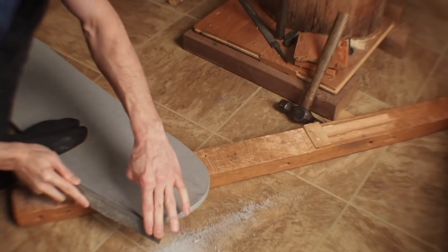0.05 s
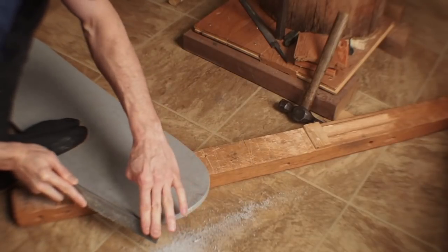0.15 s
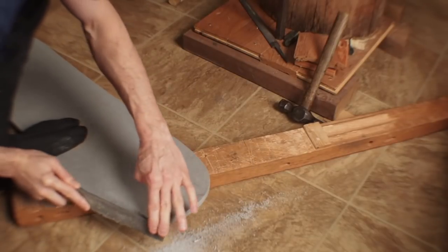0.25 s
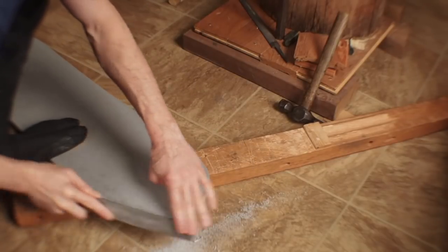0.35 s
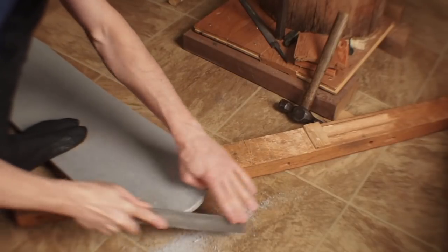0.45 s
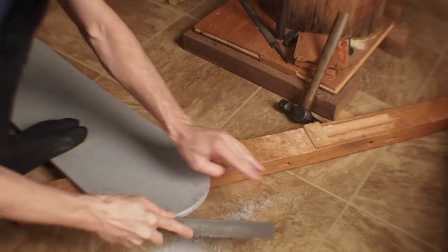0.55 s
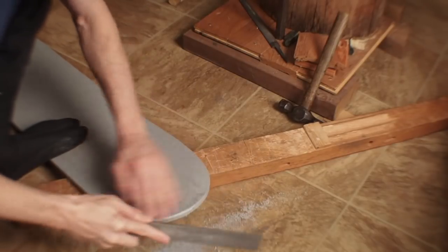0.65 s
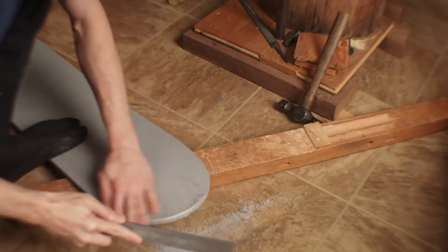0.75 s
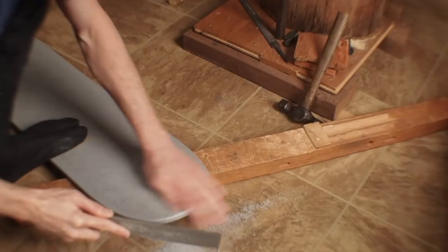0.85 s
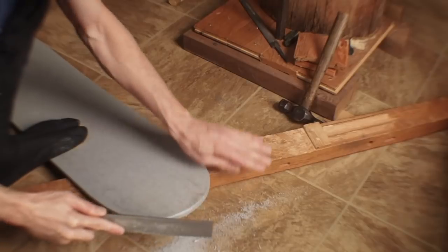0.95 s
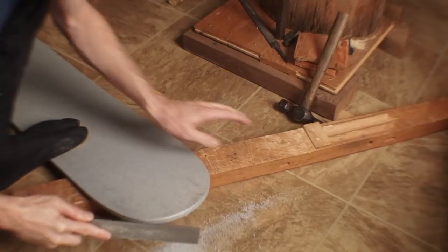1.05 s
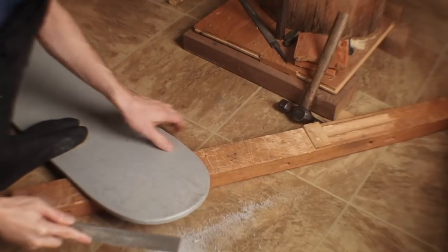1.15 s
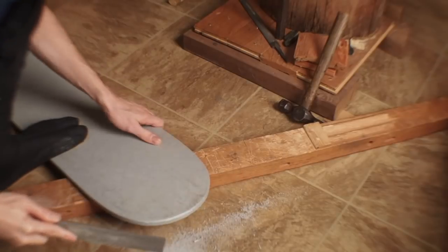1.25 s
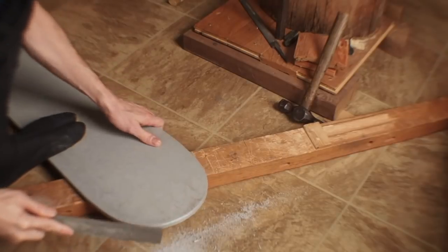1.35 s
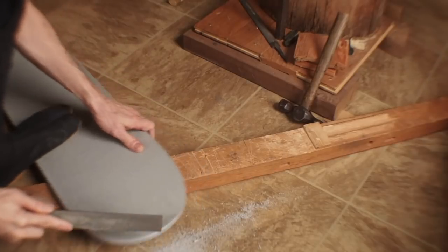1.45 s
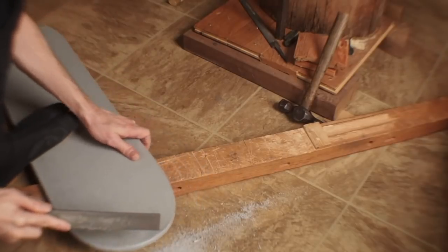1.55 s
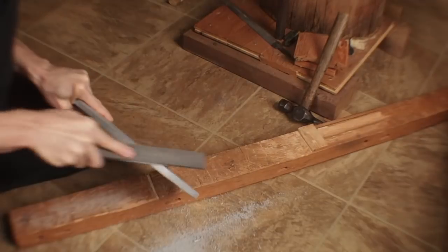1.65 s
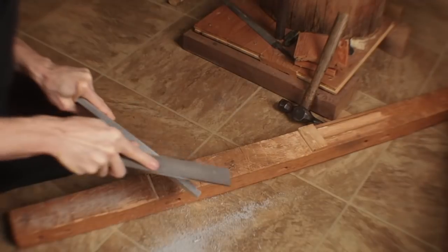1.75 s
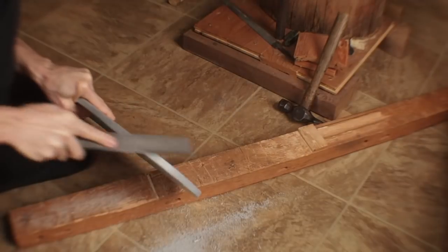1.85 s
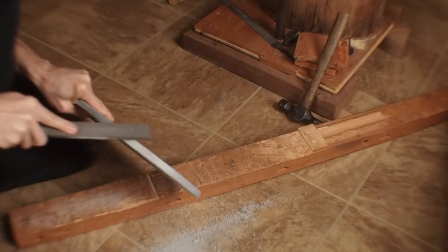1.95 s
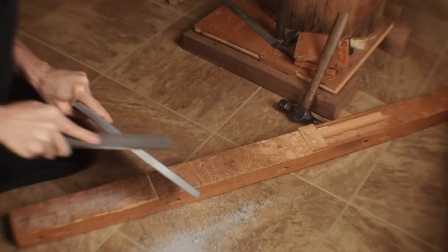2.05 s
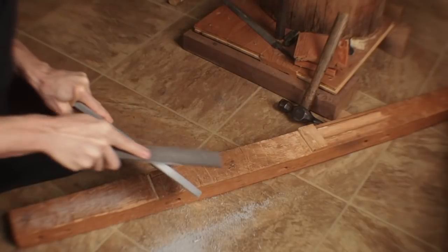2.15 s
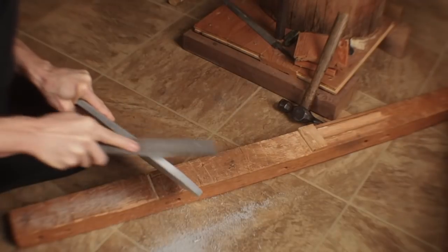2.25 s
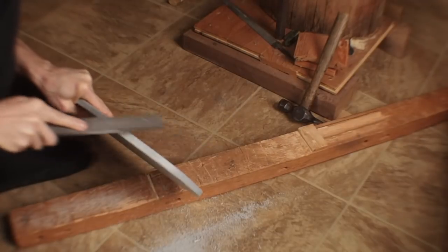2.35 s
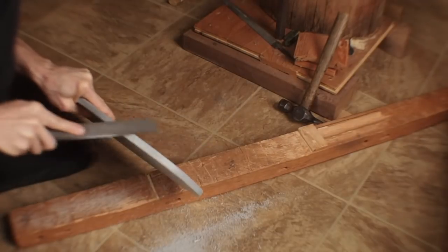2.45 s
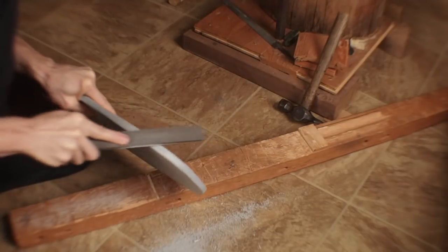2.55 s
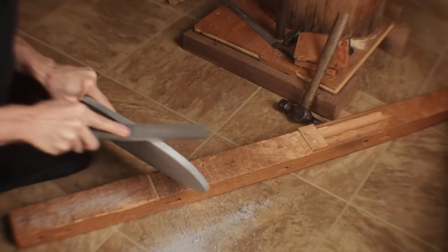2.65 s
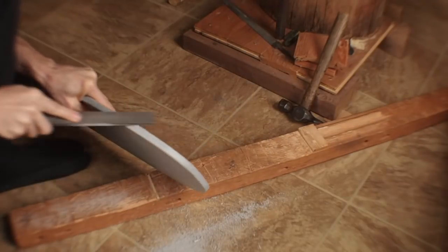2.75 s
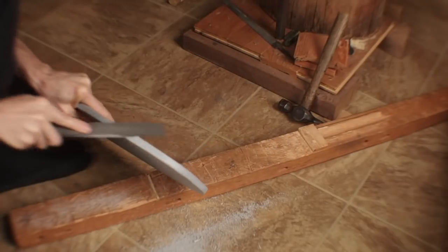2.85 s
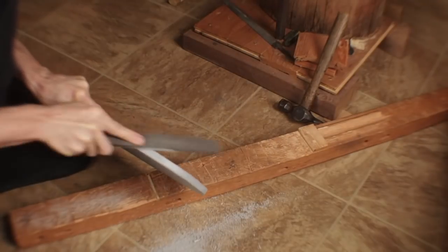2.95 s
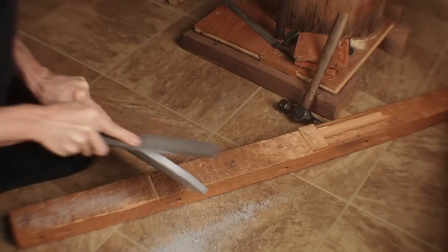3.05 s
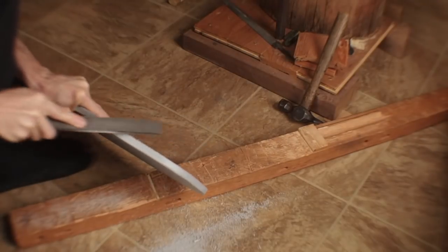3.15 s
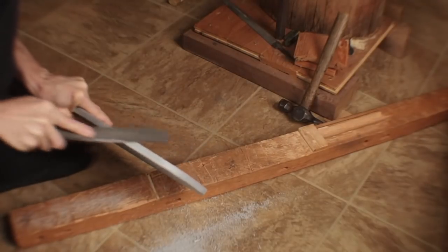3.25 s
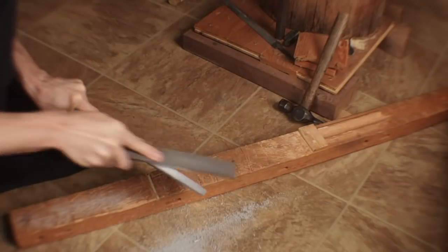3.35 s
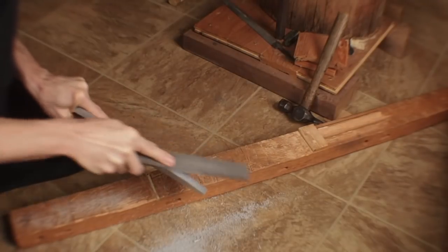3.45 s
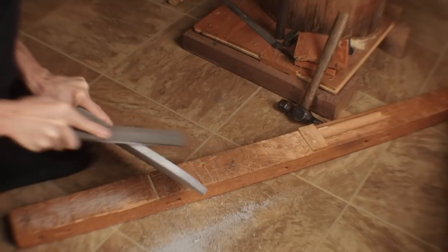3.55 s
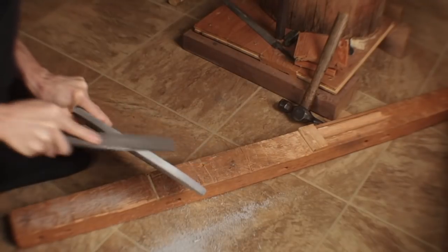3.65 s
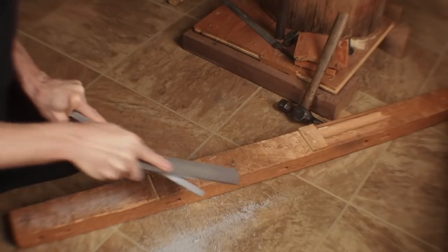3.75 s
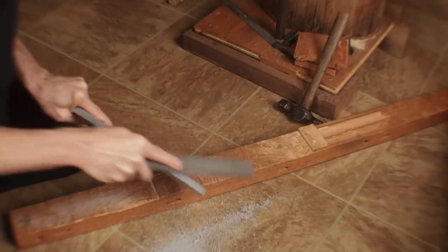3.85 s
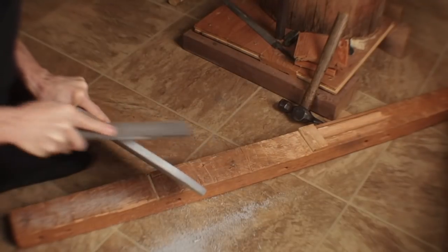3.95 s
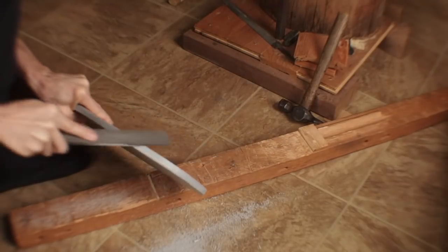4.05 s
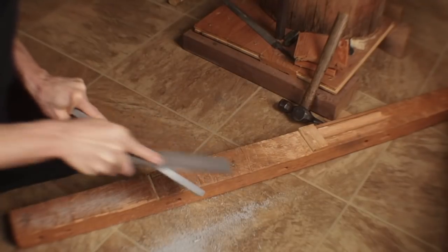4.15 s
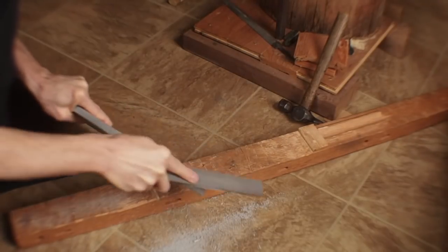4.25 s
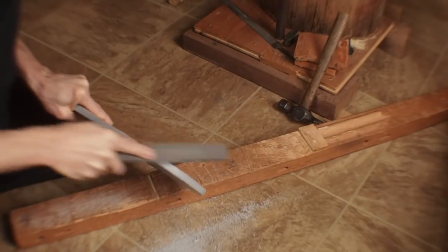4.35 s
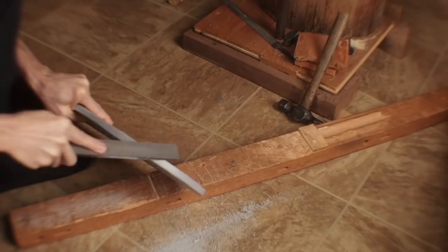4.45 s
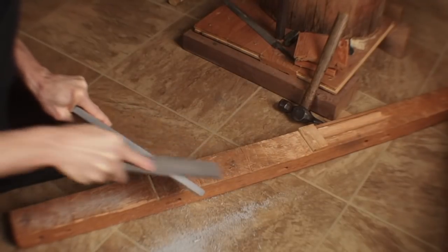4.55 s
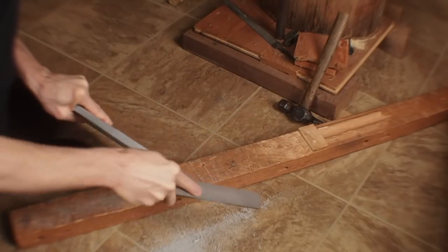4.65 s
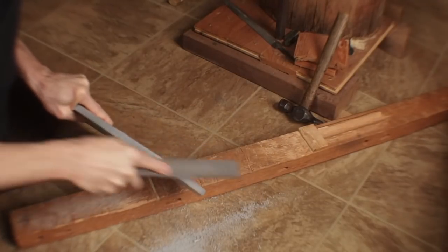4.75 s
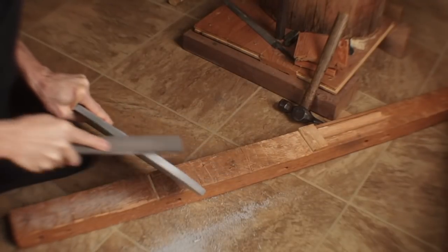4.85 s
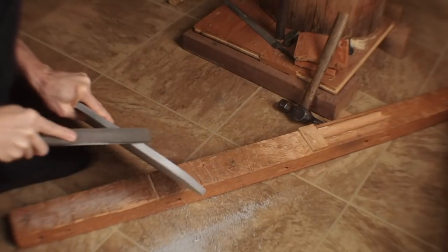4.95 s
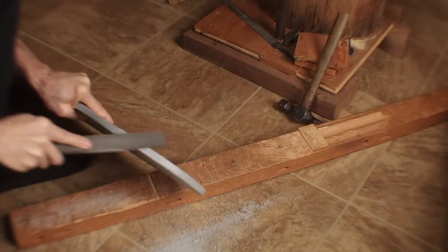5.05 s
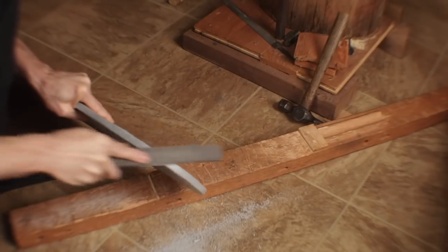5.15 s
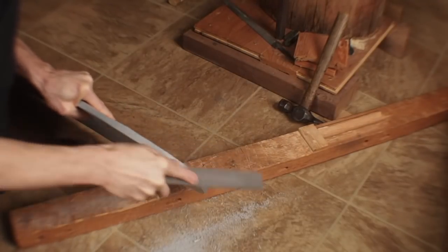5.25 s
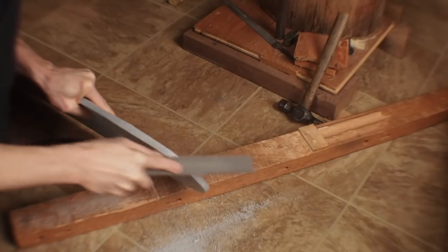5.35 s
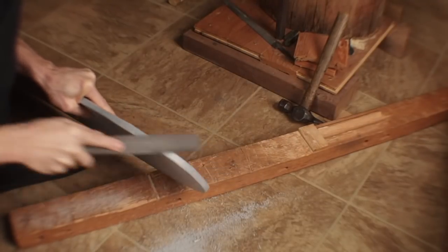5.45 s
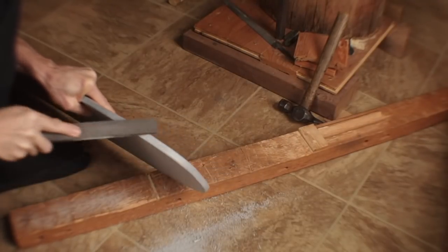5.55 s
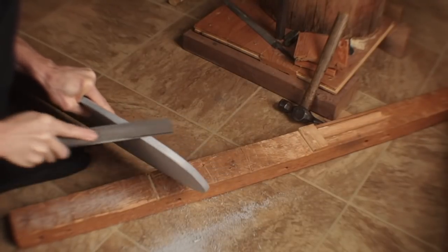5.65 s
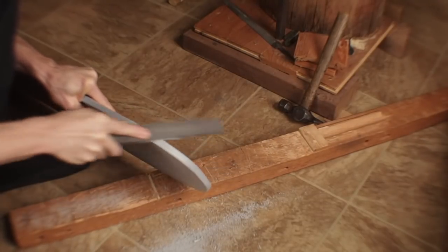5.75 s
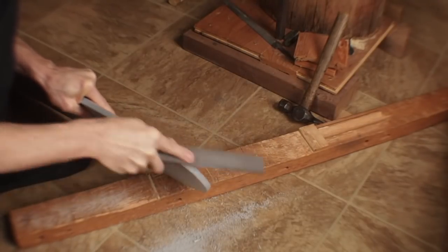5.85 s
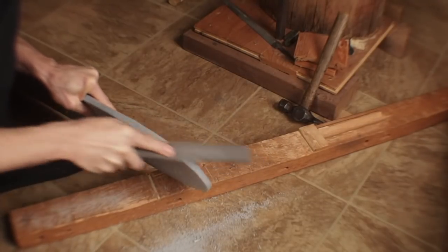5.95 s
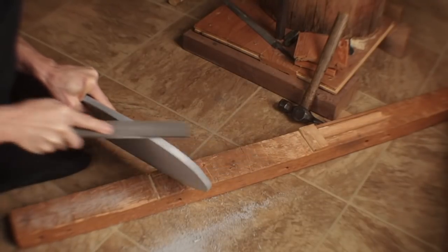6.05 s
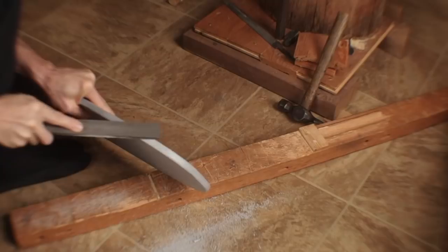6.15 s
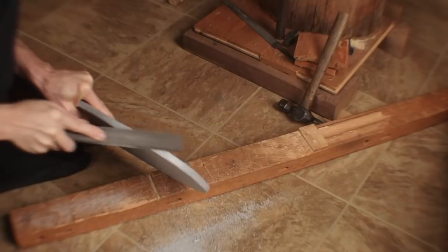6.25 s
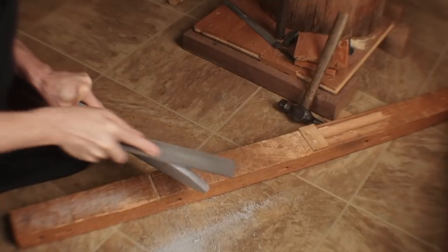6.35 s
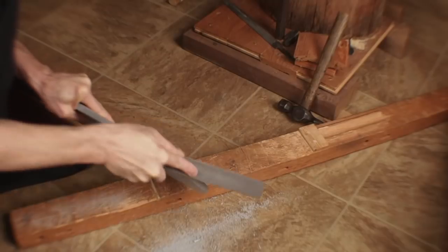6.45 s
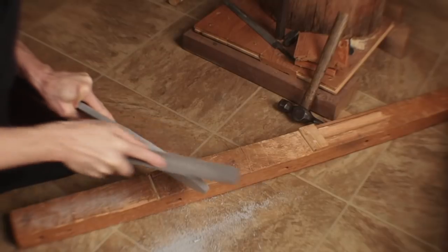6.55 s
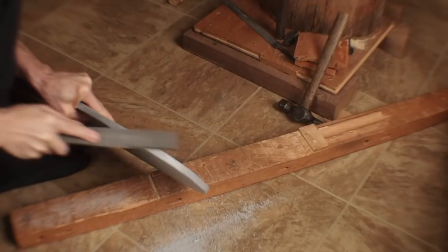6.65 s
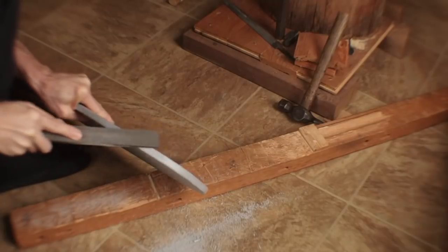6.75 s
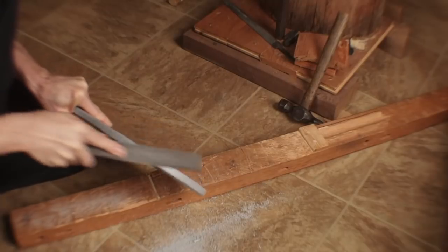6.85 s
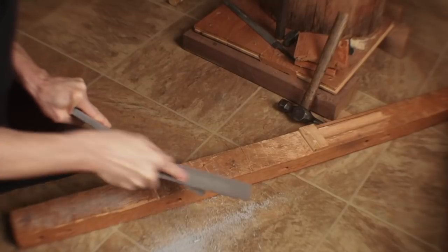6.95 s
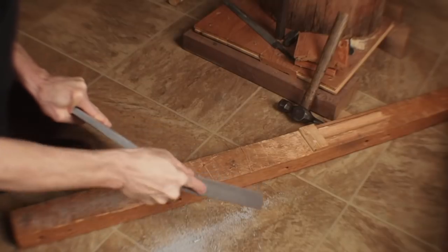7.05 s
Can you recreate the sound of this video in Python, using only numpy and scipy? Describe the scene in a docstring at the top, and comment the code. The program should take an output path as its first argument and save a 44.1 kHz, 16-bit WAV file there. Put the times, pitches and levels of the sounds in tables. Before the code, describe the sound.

In a small workshop, a hand file rasps along a plastic board's edge, then after shuffling, knocks and scrapes in repeated buzzing strokes.

```python
"""Over a faint room tone and a soft scrape, a hand file rasps once along the edge of a plastic board that
rests on a wooden beam in a small workshop, close to two microphones. A hand sweeps off the dust and tips
the board on its edge; then the file lands with a knock and is pushed across, again and again. Its teeth
buzz at a pitch that glides up or down within each stroke, over the hiss of the cut; board and blade ring."""
import sys
import numpy as np
from scipy import signal
from scipy.fft import irfft
from scipy.io import wavfile
from scipy.ndimage import uniform_filter1d

SR = 44100
rng = np.random.default_rng(int(sys.argv[2]) if len(sys.argv) > 2 else 0)


def generate_wav(sig):
    """Save sig (samples, or channels by samples) to the path in sys.argv[1] as 16-bit PCM at SR."""
    pcm = np.round(np.clip(np.atleast_2d(sig).T, -1, 1) * 32767).astype(np.int16)
    wavfile.write(sys.argv[1], SR, pcm)


N = 313551
TIME = np.arange(N) / SR

# Resonances of the board on its beam. Each row: centre in Hz, width in Hz, lift (or dip) in dB.
BOARD_MODES = [(137.2, 14.4, 16), (197, 19, 11), (284.9, 3.9, 9.5), (324, 16.7, 9), (370.4, 22, 7),
               (525, 18, 7), (616, 40, -3.5), (734, 17, -12), (898.3, 33, 10.5), (1094, 72, -9),
               (1160, 28, -22), (1224, 150, 7), (1410, 29, 1.5), (1874, 29, 10)]
# Spectrum of chips and rubbing skin. Each row: frequency in Hz, relative level in dB.
HISS_SPECTRUM = [(30, -69), (400, -2), (1200, -5), (2500, 2.5), (4000, 4.5), (6000, 2.5), (8000, 3.5),
                 (9200, -2.5), (10500, -13), (13000, -23.5), (15600, -46)]
# Spectrum of a blow on the board. Each row: frequency in Hz, relative level in dB.
BLOW_SPECTRUM = [(25, -31), (55, -29), (100, -26), (135, -14.5), (200, -5.5), (320, -3), (480, 6.5),
                 (750, 0), (1200, -5.5), (1700, -9), (2400, -10.5), (3100, -16.5), (8500, -27.5),
                 (14000, -56)]


def amp(db):
    """Decibels to gain."""
    return 10 ** (np.asarray(db) / 20)


def evened(x):
    """Scales to rms 1."""
    return x / np.sqrt(np.mean(x ** 2) + 1e-20)


def read(points, hz):
    """Reads a spectrum on a log-frequency axis."""
    f, value = np.transpose(points)
    return np.interp(np.log(hz + 1), np.log(f + 1), value)


def add(track, s, sound):
    """Mixes a sound in at s seconds."""
    part = track[max(round(s * SR), 0):][:len(sound)]
    part += sound[:len(part)]


def drift(count, hz):
    """Smooth chance of rms 1 that changes about hz times a second."""
    size = max(int(SR / hz / 2), 1)
    smooth = uniform_filter1d(rng.standard_normal(count), size)
    return evened(uniform_filter1d(smooth, size))


def colour(x, spectrum, modes=(), tilt_db=0, size=16384):
    """Causal filter of energy 1: a broad spectrum, tilted per octave above 500 Hz, with resonances on it."""
    hz = abs(np.fft.fftfreq(size, 1 / SR))
    lift = 1 + sum((amp(db) ** 2 - 1) / (1 + (2 * (hz - f) / width) ** 2) for f, width, db in modes)
    octaves = np.log2(np.maximum(hz / 500, 1))
    gain = amp(read(spectrum, hz) + tilt_db * octaves) * np.sqrt(np.maximum(lift, 1e-3))
    # minimum phase: the response starts at once and rings afterwards
    response = np.exp(np.conj(signal.hilbert(np.log(gain))))
    taps = np.fft.ifft(response).real[:size // 2]
    return signal.oaconvolve(x, taps / np.linalg.norm(taps))[:N]


def grit(clump_db, clump_hz):
    """Countless tiny fractures that come in clumps."""
    return evened(rng.standard_normal(N) * amp(clump_db * drift(N, clump_hz)))


def arch(u, crest):
    """Speed of one move of the arm: from rest at u = 0 up to 1 at the crest, and back to rest at u = 1."""
    return np.sin(np.pi * np.interp(u, [0, np.clip(crest, .1, .9), 1], [0, .5, 1]))


def room_tone(level_db=-64, apart=0.79):
    """Faint steady background, partly shared by both microphones."""
    # Each row: frequency in Hz, relative level in dB.
    quiet_spectrum = [(22, -17), (55, -3.5), (100, 0), (350, 3.5), (800, -2), (1500, -3.5), (3000, -9.5),
                      (6000, -10), (8500, -13.5), (11000, -19), (15600, -23.5)]
    shared, side = (colour(rng.standard_normal(N), quiet_spectrum) for _ in range(2))
    return amp(level_db) * np.array([shared + apart * side, shared - apart * side])


def handling(drag_db=-4, swish_db=0.0, crest=0.41, power=1.15):
    """Skin swishes over the plastic; the board grates on the beam as it turns."""
    # The palm sweeps the board or drags it round on the beam.
    # Each row: start in seconds, length in seconds, relative drag in dB, relative swish in dB.
    hand_moves = [(-0.04, 0.18, -51.5, -75), (0.198, 0.28, -42.5, -54.5), (0.725, 0.21, -53.5, -41),
                  (1.124, 0.3, -61.5, -56), (1.227, 0.025, -72, -54), (1.33, 0.24, -34.5, -51),
                  (1.545, 0.091, -40, -55.5), (1.649, 0.16, -51, -51.5)]
    # Grating of board on beam. Each row: frequency in Hz, relative level in dB.
    drag_spectrum = [(25, -23), (55, -22), (100, -34), (200, -12), (400, 2.5), (700, 4), (1300, -6.5),
                     (2500, -7.5), (6000, -17), (16000, -66)]
    drag, swish = np.zeros((2, N))
    for start, length, low_db, high_db in hand_moves:
        move = arch((TIME - start) / length, crest) ** power
        drag += amp(low_db) * move
        swish += amp(high_db) * move
    grating = colour(drag * grit(clump_db=2.5, clump_hz=90), drag_spectrum, BOARD_MODES)
    rubbing = colour(swish * grit(clump_db=2.0, clump_hz=300), HISS_SPECTRUM)
    return amp(drag_db) * grating + amp(swish_db) * rubbing


def filing(wander=.35, uneven_db=3.5, gating=0.13, push_db=1.0, bite_db=-6, hiss_db=-4.5, tone_db=0,
           throb_db=4.5, throb_hz=38.6, lock_s=0.021, cut_power=1.07, push_power=0.99,
           sag_octaves=0.33, lean_db=7.5, sing_power=0.22):
    """Teeth pluck the board and tear off puffs of chips; returns the rasp and the board's low tone."""
    # Each row: start in seconds, length in seconds, crest of the speed as a share of the length,
    # relative hiss in dB, teeth passing at mid-stroke in Hz, glide over the stroke in octaves,
    # moment of the hardest lean in seconds, spread of the lean in seconds, relative push on the board in dB,
    # unsteadiness of the teeth as a share of their spacing, relative hardness of the bite in dB,
    # share of the push that sings from 0 to 1.
    strokes = [ (0.272, 0.235, .58, -30, 453, 1.45, 0.43, 0.24, -25.5, .055, 6, 0.87),
               (1.979, 0.19, 0.39, -34, 311.5, 0.052, 2.09, 0.05, -32.5, 0.051, 1.5, 0.71),
               (2.42, 0.2, 0.23, -33, 370, -0.076, 2.55, 0.035, -29.5, 0.085, 8, 0),
               (2.783, 0.23, 0.36, -33.5, 429.4, -1.74, 2.895, 0.063, -28.5, .11, 4, 0.63),
               (3.196, 0.24, 0.37, -33, 425.5, 0.64, 3.25, 0.048, -33.5, .15, 4.5, 0.45),
               (3.607, 0.22, 0.37, -33, 357.4, 0.26, 3.69, 0.034, -26, .04, 4, 0.75),
               (4.023, 0.23, 0.36, -33, 383.5, 0.2, 4.09, 0.037, -28.5, 0.062, 5, 0.82),
               (4.454, 0.21, 0.46, -34.5, 396, 0.56, 4.61, 0.076, -29, 0.075, 0, 0.97),
               (4.991, 0.26, 0.58, -33.5, 255.4, .7, 5.19, 0.025, -27, .06, 3, 0.85),
               (5.593, 0.3, 0.23, -33.5, 210.8, -0.26, 5.7, 0.034, -24.5, 0.097, 3.5, 0.65),
               (6.164, 0.32, 0.32, -38, 228.5, -0.89, 6.29, 0.041, -34.5, 0.1, 4.5, 0.81),
               (6.737, 0.3, 0.46, -35.5, 375.5, 1.5, 6.87, 0.06, -36, 0.066, 5, 0.63), ]
    # Push of the teeth, then their snap. Each row: frequency in Hz, relative level in dB.
    push_spectrum = [(30, -47.5), (100, -56), (135, -26), (190, -8), (400, 2), (650, 7.5), (1000, -4),
                     (2000, -12.5), (5000, -70.5), (16000, -109)]
    bite_spectrum = [(30, -75), (300, -24), (700, 12.5), (1100, 3), (2000, 2), (3500, -7.5), (8000, -38.5),
                     (16000, -42)]
    push, bite, cut, tone = np.zeros((4, N))
    t = np.arange(SR // 2) / SR
    for (start, length, crest, cut_db, mid_hz, glide, lean_at, lean_s,
         force_db, jitter, hardness_db, singing) in strokes:
        u = np.minimum(t / length, 1)
        speed = arch(u, crest)
        lean = np.exp(-.5 * ((start + t - lean_at) / lean_s) ** 2)
        cutting = amp(cut_db) * speed ** cut_power
        force = amp(force_db + lean_db * (lean - 1)) * speed ** push_power

        # the tooth rate glides over the stroke and sags a little towards both ends
        rate = mid_hz * 2 ** (glide * (u - .5) - sag_octaves * (2 * u - 1) ** 2)
        rate = rate * (1 + wander * jitter * drift(len(t), 60))
        turns = np.cumsum(rate) / SR
        at = np.flatnonzero(np.diff(np.floor(turns)))
        late, depth = rng.standard_normal((len(t), 2))[:len(at)].T
        period = SR / rate[at]  # in samples
        places = np.clip(at + jitter * period * late, 0, len(t) - 1).astype(int)
        teeth = np.zeros(len(t))
        teeth[places] = np.sqrt(period) * amp(uneven_db * depth)

        # when the teeth ride in step, the board swings smoothly at their rate instead of being jolted
        locked = np.clip(t / lock_s, 0, 1)
        swing = evened(np.sin(2 * np.pi * turns) * amp(throb_db * drift(len(t), throb_hz)))
        # the board sings most under the lean
        add(tone, start, locked * singing * lean ** sing_power * force * swing)
        add(push, start, np.sqrt(1 - singing ** 2) * force * teeth)
        # the snap of a tooth grows with both the push and the depth of the cut
        add(bite, start, teeth * np.sqrt(force * cutting) * amp(hardness_db))
        add(cut, start, cutting * (1 + gating * np.cos(2 * np.pi * turns)))
    jolts = amp(push_db) * colour(push, push_spectrum, BOARD_MODES)
    snaps = amp(bite_db) * colour(bite, bite_spectrum, BOARD_MODES)
    chips = amp(hiss_db) * colour(cut * grit(clump_db=1.5, clump_hz=514.4), HISS_SPECTRUM)
    return jolts + snaps + chips, amp(tone_db) * tone


def blade(rise_s=0.013, throb=0.38, throb_hz=7.0):
    """The steel rings, each time with one pure tone of its own pitch, throbbing as it dies."""
    # The blade starts to ring late in a stroke and sings on after it.
    # Each row: start in seconds, pitch in Hz, relative level in dB, time to fall by 60 dB in seconds.
    blade_rings = [(0.45, 563.5, -40.5, 0.91), (2.959, 274, -38.5, 0.32), (4.6, 422, -46, 0.35),
                   (5.19, 275.4, -38.5, 0.38)]
    ring = np.zeros(N)
    for s, hz, db, t60 in blade_rings:
        t = np.maximum(TIME - s, 0)
        level = np.minimum(t / rise_s, 1) * amp(db - 60 * t / t60)
        level *= 1 + throb * np.cos(2 * np.pi * throb_hz * t)
        ring += level * np.sin(2 * np.pi * hz * t)
    return ring


def knocks(blow_db=9, bounce_s=.007, bounce=1.2, settle_s=0.025, sharp_db=0.5, soft_db=-2.0,
           rattle=0.076, graze_db=-32, graze_s=0.025):
    """A sharp blow on the board, then a softer bounce and a brief rattle and graze as the contact settles."""
    # The file lands, or the board is bumped or set down.
    # Each row: moment in seconds, relative strength in dB, relative hardness as a tilt in dB per octave.
    blows = [(0.73, -38.5, -5), (1.158, -41.5, -9), (1.554, -24.5, 0.5), (1.689, -31, 2.5),
             (1.963, -18, 0.5), (2.422, -9.5, 0.5), (2.731, -14.5, 0), (3.183, -16.5, -1), (3.576, -14, -1),
             (4.023, -12, 0), (4.436, -12, -1), (4.939, -20.5, -2), (5.548, -28, 0), (6.068, -14, 0.5),
             (6.693, -20.5, -3.5)]
    track, graze = np.zeros((2, N))
    t = np.arange(SR // 8) / SR
    for s, db, hardness_db in blows:
        strike = -colour(signal.unit_impulse(len(t)), BLOW_SPECTRUM, BOARD_MODES, hardness_db + sharp_db)
        settling = rattle * rng.standard_normal(len(t)) * np.exp(-t / settle_s)
        settling[round(bounce_s * rng.uniform(.88, 1.12) * SR)] = bounce
        soft = colour(settling, BLOW_SPECTRUM, BOARD_MODES, hardness_db + soft_db)
        add(track, s, amp(db + blow_db) * (strike + soft))
        add(graze, s, amp(db + graze_db) * np.exp(-t / graze_s))
    return track + colour(graze * grit(clump_db=2.5, clump_hz=400), HISS_SPECTRUM)


def judder(rate_hz=520, level_db=-1.0, bright_db=2.5, low_hz=130, high_hz=2500):
    """Under a hard push the file hops on the edge: a short burst of irregular blows."""
    # Each row: moment of the height in seconds, spread in seconds, relative level in dB.
    bursts = [(2.515, 0.01, -18), (5.708, 0.021, -19.5)]
    turns = np.cumsum(rate_hz * np.exp(.5 * drift(N, 300))) / SR
    hops = np.diff(np.floor(turns), prepend=0)
    burst = sum(amp(db) * np.exp(-.5 * ((TIME - s) / spread) ** 2) for s, spread, db in bursts)
    hits = evened(hops * rng.choice([-1, 1], N)) * burst
    band = signal.butter(3, [low_hz, high_hz], "band", fs=SR, output="sos")
    return amp(level_db) * colour(signal.sosfilt(band, hits), BLOW_SPECTRUM, BOARD_MODES, bright_db)


def workshop(x, echo_db=1.5, build_s=0.0019, size=32768):
    """Direct sound, a few strong reflections and a diffuse tail, at two close microphones."""
    # Each row: frequency in Hz, time for the tail to fall by 60 dB in seconds.
    room_t60 = [(150, 0.19), (400, 0.37), (1000, 0.34), (2800, 0.44), (7500, 0.39), (14000, 0.16)]
    # Each row: frequency in Hz, relative level of the tail in dB.
    room_wet = [(100, 5.5), (400, 0), (1200, -1.5), (3000, 0.5), (8000, -0.5)]
    # Each row: frequency in Hz, left-right likeness of the tail from -1 to 1.
    room_same = [(100, 0.97), (350, .95), (700, 0.85), (1400, 0.58), (2800, -0.22), (5000, -0.069),
                 (9000, -0.43)]
    # First reflections from floor, walls and ceiling.
    # Each row: delay in seconds, relative gain, lead of the left microphone in seconds.
    echoes = [(.0028, 0.41, .00005), (.0071, 0.16, -.00007), (0.01, .35, .00009), (0.0186, 0.21, .00005)]
    hz, t, (a, b) = signal.stft(rng.standard_normal((2, size)), SR, nperseg=256)
    same = np.clip(read(room_same, hz), -1, 1)[:, None]
    t60 = read(room_t60, hz)[:, None]
    mid, side = a * np.sqrt((1 + same) / 2), b * np.sqrt((1 - same) / 2)
    decay = amp(read(room_wet, hz)[:, None] - 60 * t / t60)
    decay *= np.sqrt(2 * np.log(1000) / (t60 * SR))  # evens the energy of long and short tails
    tail = signal.istft(np.array([mid + side, mid - side]) * decay, SR, nperseg=256)[1][:, :size]
    tail *= 1 - np.exp(-(TIME[:size] / build_s) ** 2)

    hz, ear = np.fft.rfftfreq(size, 1 / SR), np.array([[-.5], [.5]])
    early = sum(gain * np.exp(-2j * np.pi * hz * (delay + ear * lead)) for delay, gain, lead in echoes)
    direct_and_early = irfft(1 + amp(echo_db) * early)
    return signal.fftconvolve(x[None], tail + direct_and_early, axes=1)[:, :N]


def scene(left_db=0.14, tone_room=0.57):
    """All the work sits just left of centre; part of the low tones reaches the microphones without the room."""
    rasp, tone = filing()
    tone = tone + blade()
    work = rasp + judder() + knocks() + handling()
    heard = workshop(work + tone_room * tone) + (1 - tone_room) * tone
    return heard * amp([[left_db], [-left_db]]) + room_tone()


def record(dry, edge_hz=15650):
    """The recorder's band limit: a steep low-pass."""
    taps = signal.firwin(511, edge_hz, window=("kaiser", 9), fs=SR)
    return signal.oaconvolve(dry, taps[None], "same")


dry = scene()
out = record(dry)
generate_wav(out)
```